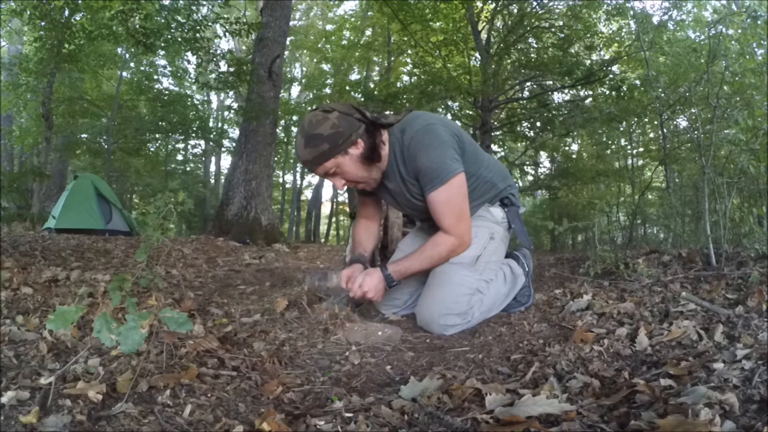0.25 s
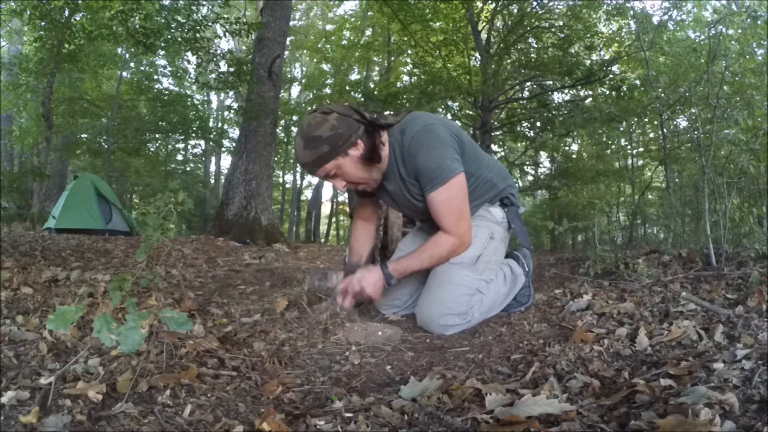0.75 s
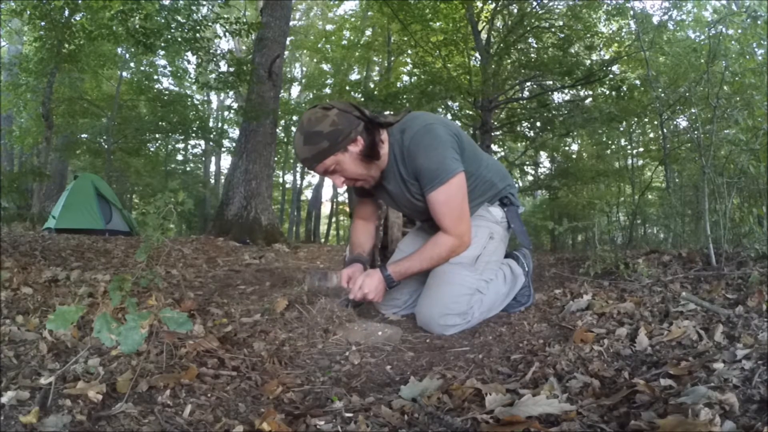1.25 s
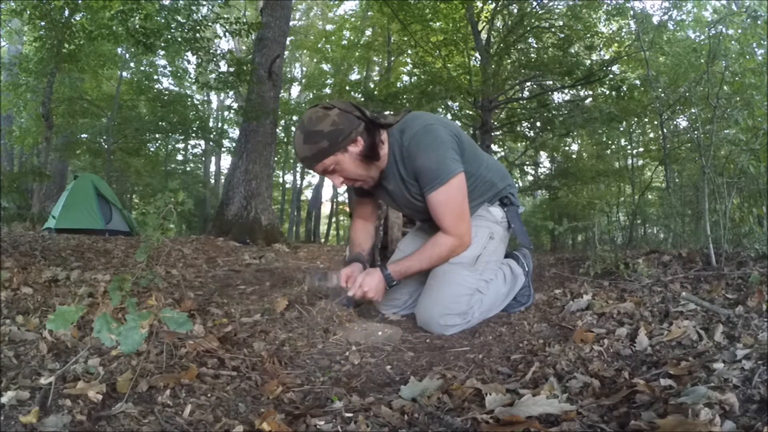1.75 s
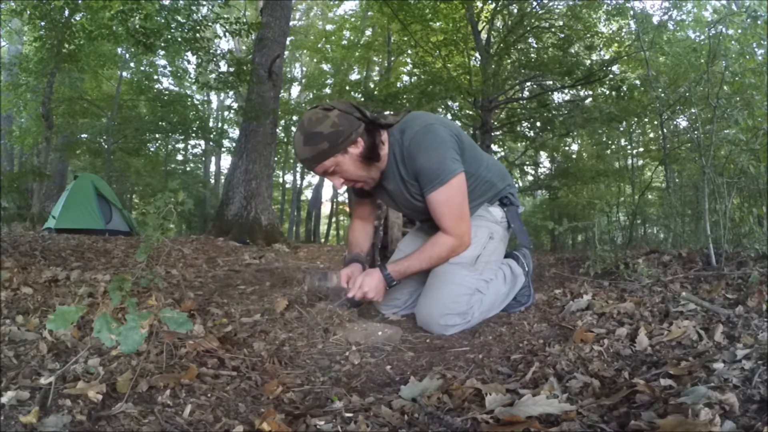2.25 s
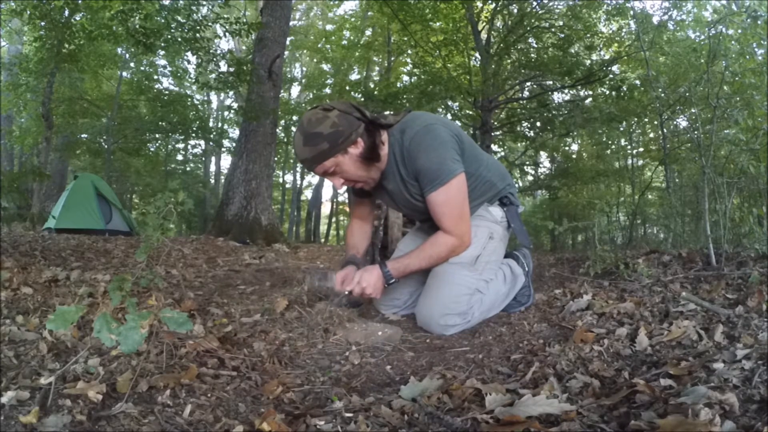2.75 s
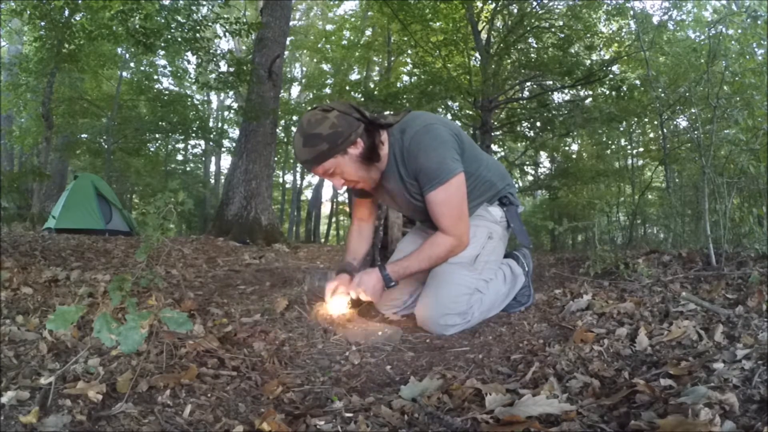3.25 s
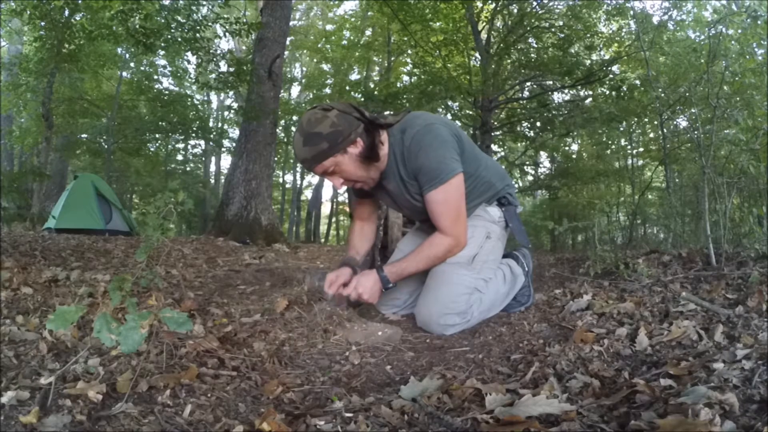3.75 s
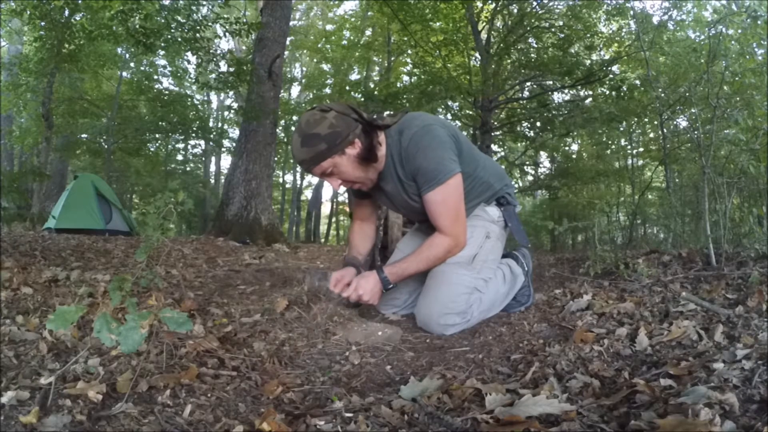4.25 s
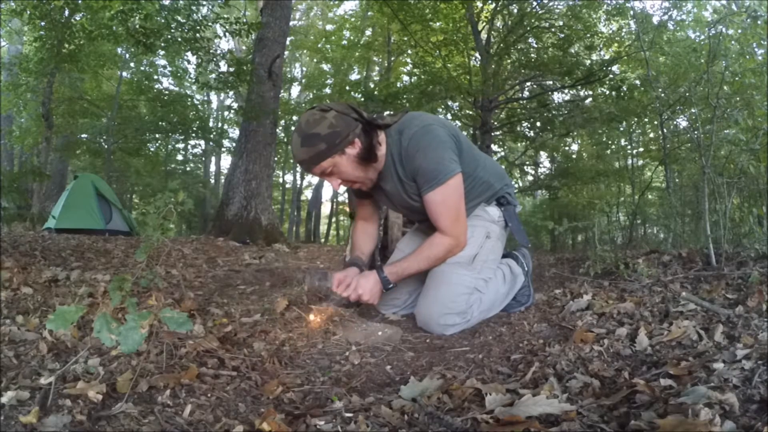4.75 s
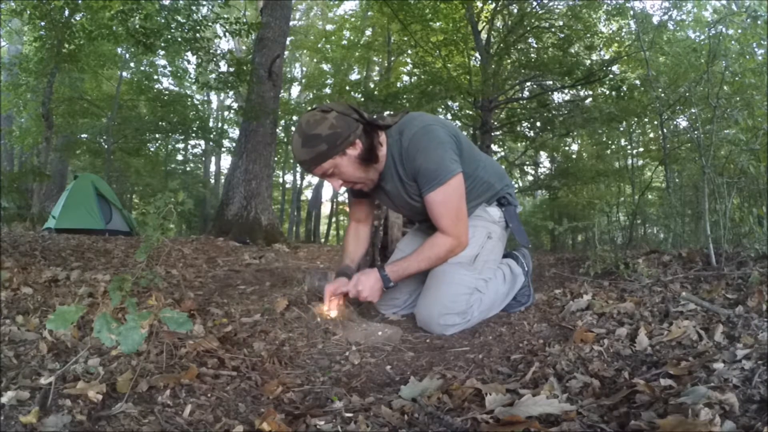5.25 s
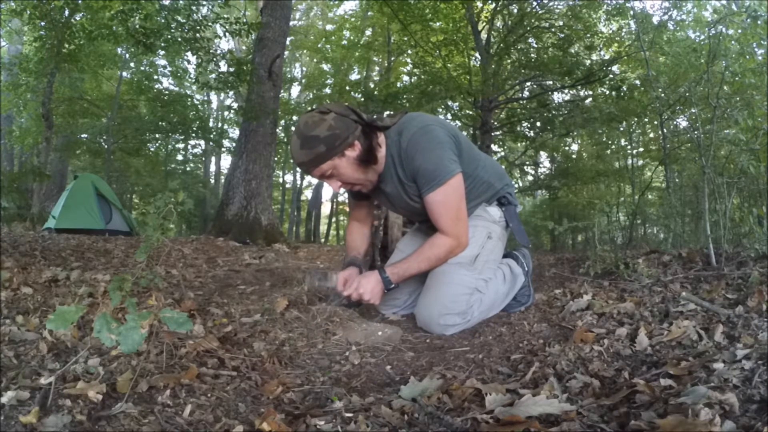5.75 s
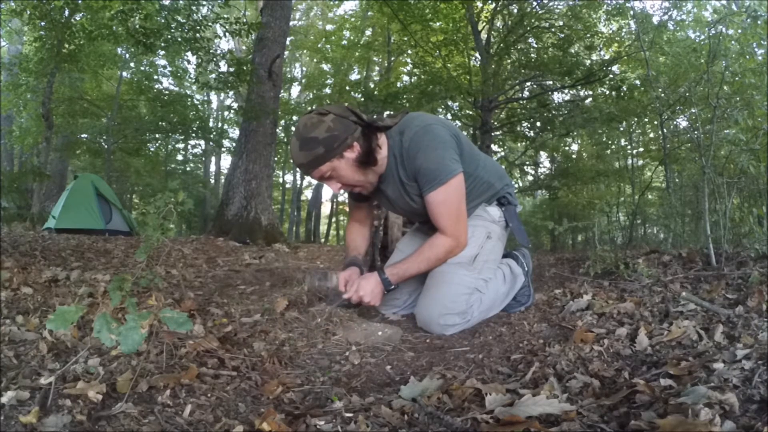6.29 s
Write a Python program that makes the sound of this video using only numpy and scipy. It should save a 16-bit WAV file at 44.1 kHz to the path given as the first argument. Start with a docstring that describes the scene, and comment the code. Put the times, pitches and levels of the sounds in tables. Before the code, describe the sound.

Repeated scraping of steel on a fire-starting rod outdoors: bright grinding zips end in clicks, then a soft puff and fizz of burning shavings. The scraper knocks the rod between strokes with short, finger-damped ticks of uneven strength. Light reflections from ground and foliage give a small open space. Low distant rumble and hum recede after the start, leaving a faint steady hiss and barely audible bird whistles. Nearly mono, no close ambience.

```python
"""Someone kneeling in a quiet wood strikes a ferrocerium rod with a steel scraper, fourteen times.
From the start: a low rumble, a drone and a thin hiss of air, all filtered noise; the first slip comes at once.
Each stroke is a swelling grind (noisy clicks), a slip, then sparks; knocks (damped modes) have their own times.
Rumble and drone fade from 1.7 s; far whistles (gliding sines) at 3.0 and 5.1 s; late shavings fizz after 5 s.
Sparse echoes and a decaying scatter place all but the background among trees."""
import sys
import numpy as np
from scipy import signal
from scipy.fft import rfft, irfft
from scipy.io import wavfile

SR = 44100
rng = np.random.default_rng(int(sys.argv[2]) if len(sys.argv) > 2 else 0)


def transcribe(signal):
    """Save signal, clipped to [-1, 1], as a 16-bit WAV file at the path in sys.argv[1]."""
    frames = np.atleast_2d(signal).T
    limited = np.clip(frames, -1, 1)
    pcm = np.round(limited * 32767).astype(np.int16)
    wavfile.write(sys.argv[1], SR, pcm)


N = 287532
T = np.arange(N) / SR  # s

# Event levels are nominal: layer gains, filters and the wood act on them later.
# Strokes along the rod: slip_s, draw_s, grind_db, snap_db, sparks_db, burn_s
STROKES = [(0.01, 0.046, -70, -64, -54, .075), (0.377, 0.082, -52.5, -28.5, -55.5, 0.035),
           (0.7662, 0.025, -51, -25.5, -61, 0.027), (1.4826, .06, -52, -30, -47.5, 0.03),
           (1.948, .052, -51.5, -33.5, -47, 0.028), (2.4365, 0.074, -53, -30.5, -51, 0.021),
           (2.848, 0.076, -54.5, -23.5, -47, 0.014), (3.293, 0.059, -52, -38, -48, 0.024),
           (3.7247, 0.075, -52.5, -34, -49.5, 0.019), (4.1496, 0.058, -55, -32, -49, 0.031),
           (4.6117, 0.066, -51.5, -28, -45, 0.026), (5.29, 0.057, -49, -33.5, -49.5, 0.027),
           (5.8563, .055, -50, -28, -50, 0.015), (6.4041, 0.07, -49.5, -28.5, -47.5, 0.039)]
# Knocks of scraper on rod: start_s, strength_db, favoured_hz
KNOCKS = [(0.2644, -35.5, 7700), (0.398, -40, 4150), (.627, -34, 3800), (0.863, -50, 4000),
          (0.8673, -24, 6470), (1.1754, -49.5, 4000), (1.4367, -39.5, 11000), (1.5494, -13.5, 5120),
          (1.7798, -35, 7300), (2.2447, -49.5, 3200), (2.2748, -46, 4000), (2.512, -14.5, 6100),
          (2.7135, -34, 6850), (3.148, -27, 4240), (3.566, -43, 2500), (3.5778, -28.5, 7460),
          (3.624, -43.5, 4150), (3.714, -27, 11000), (3.906, -30, 4140), (3.9848, -41, 7260),
          (4.4376, -29.5, 7500), (4.9925, -44.5, 7100), (5.3617, -19, 10500), (5.658, -46, 3860),
          (6.2185, -51, 3980), (6.2407, -57, 3000)]
# Finger-damped modes of scraper and rod: mode_hz, level_db, t60_s
STEEL_MODES = [(2040, -11.5, 0.011), (2900, -9, 0.017), (3844, -1, 0.0099), (4370, -9, 0.012),
               (5080, -3, .011), (6330, -5, 0.006), (7204, -2, 0.014), (7970, -8, 0.01), (10700, -6, 0.002),
               (13000, -15, 0.0012)]
# Late-burning stray shavings: start_s, level_db, t60_s
STRAYS = [(5.02, -63, 0.045), (6.06, -64, 0.19), (6.488, -54.5, 0.033)]
# Far bird's arched whistles: start_s, length_s, end_fall_share, level_db
WHISTLES = [(3.025, 0.1, 0.12, -75), (5.053, 0.14, .14, -83)]
# Reflections from ground and body: delay_s, level_db
ECHOES = [(.0015, -19), (.0025, -32), (.0102, -21.5), (0.0132, -18.5)]

# Drive of the steel by a knock of usual strength: freq_hz, level_db
KNOCK_DRIVE = [(3800, -16.5), (5300, -16.5), (7300, -16.5), (10000, -25.5), (15000, -26)]
# Drive of the steel by a slip of usual strength: freq_hz, level_db
SLIP_DRIVE = [(3800, -12.5), (5300, -15.5), (7300, -12), (10000, -17.5), (15000, -19)]

# Relative spectra, all with columns freq_hz, level_db (per Hz)
# Crushed skin of the rod
CRACK_SPECTRUM = [(250, -13), (600, -11.5), (1200, -9), (2200, -6), (3000, -1), (5000, 1), (8000, 2),
                  (11000, 0), (15000, -5.5)]
# Grinding edge
GRIND_SPECTRUM = [(200, -1), (600, -3.5), (1500, -11.5), (2300, -10.5), (2900, -29), (3300, -8.5),
                  (5800, -2), (7100, 6), (8200, 1.5), (9100, 5.5), (10500, -6.5), (15500, -12)]
# Rasp of the rod
RASP_SPECTRUM = [(2000, -27.5), (3200, -19.5), (3650, -4.5), (4000, 3), (4350, 1.5), (4800, -10),
                 (6500, -27)]
# Hissing sparks
HISS_SPECTRUM = [(300, -21.5), (2000, -8), (2700, 0.5), (3400, 2), (4000, -13), (4500, -0.5), (5150, 7.5),
                 (5700, 0.5), (6700, 1.5), (7200, 5.5), (10000, -3.5), (15500, -10.5)]
# Puff of the flare
FLARE_SPECTRUM = [(100, 5.5), (250, -1.5), (500, -4), (800, -3), (1100, -10), (1550, -7.5), (2100, -15),
                  (4000, -5.5), (12000, -8)]
# Stray shavings
STRAY_SPECTRUM = [(1500, -21), (5000, -2), (9000, 1), (15000, -4)]
# Scatter from foliage
FOLIAGE_SPECTRUM = [(200, -20.5), (1000, -4.5), (3500, -4), (7000, -1.5), (10000, 0), (15500, -2)]
# Low rumble
RUMBLE_SPECTRUM = [(8.8, -22), (15, 0), (54, 1), (104, -8), (161, -20), (200, -16.5), (260, -47),
                   (440, -120)]
# Far drone
DRONE_SPECTRUM = [(80, -13), (125, 6.5), (170, -13), (215, -0.5), (280, -1.5), (360, -1.5), (430, -18),
                  (600, -31), (1200, -47.5)]
# Thin even hiss
AIR_SPECTRUM = [(260, -24.5), (450, 0.5), (545, -2), (1370, -6), (2660, -7.5), (3830, -7.5), (5870, -7.5),
                (6890, -8), (7870, -10.5), (15000, -12)]
# Faint noise that differs between left and right
SIDE_SPECTRUM = [(20, 14), (120, -11), (500, -32.5), (4000, -23.5), (15000, -35)]

RASP_REL_GRIND_DB = -2.5
USUAL_SPARKS_DB, HISS_T60_S = -50, 0.14
FLARE_DB, FLARE_DB_PER_SPARKS_DB = -55.5, 1.52  # flare level at usual sparks
USUAL_CONTACT_DB, DRIVE_PIVOT_HZ = -30, 5000
BRIGHTEN_DB_PER_OCTAVE = 0.44  # per dB that a contact is harder
FAVOUR_DB, FAVOUR_OCTAVES, SLIP_FAVOURS_HZ = 7.5, 0.26, 4260
MODE_DETUNE_SHARE = 0.01337
CATCH_DB, CATCH_GROWTH_DB = 18.5, 18.5  # over grind_db at the end of a draw; rise along it
WHISTLE_PEAK_HZ = 5030
RUMBLE_DB, DRONE_DB, AIR_DB = -51, -62, -76.5
RECEDE_FROM_S, RUMBLE_FADE_DB_PER_S, DRONE_FADE_DB_PER_S = 1.72, 0.65, 2.5
CUTOFF_HZ = 15600


def scrapes(swell_db=17, rasp_swell_db=13, release_s=0.0018, kindle_s=0.017, glow_s=0.012,
            die_s=0.0049, wane_db=4, bite_share=0.26):
    """The edge tears off shavings, louder along the draw; they ignite, hiss and sputter."""
    grind, rasp, hiss, flare = np.zeros((4, N))
    for slip_s, draw_s, grind_db, _, sparks_db, burn_s in STROKES:
        now = slice(*np.searchsorted(T, [slip_s - 0.15, slip_s + 0.3]))
        travel = np.clip(1 + (T[now] - slip_s) / draw_s, 0, 1)
        before_s = np.maximum(slip_s - T[now], 0)
        after_s = np.maximum(T[now] - slip_s, 0)
        contact = np.minimum(travel / bite_share, 1) * np.exp(-after_s / release_s)
        grind[now] += contact * from_db(grind_db + swell_db * (travel - 1.07))
        rasp_db = grind_db + RASP_REL_GRIND_DB + rasp_swell_db * (travel - 0.27)
        rasp[now] += contact * from_db(rasp_db)
        hiss_db = sparks_db - 60 * after_s / HISS_T60_S
        hiss[now] += np.exp(-before_s / kindle_s) * from_db(hiss_db)
        # the flash puffs the air, wanes while the shavings burn, then goes out
        flare_db = FLARE_DB + FLARE_DB_PER_SPARKS_DB * (sparks_db - USUAL_SPARKS_DB)
        glow = np.exp(-before_s / glow_s - np.maximum(after_s - burn_s, 0) / die_s)
        flare[now] += from_db(flare_db - wane_db * after_s / burn_s) * glow
    bites = flutter(per_s=630, depth_db=0.5)  # the edge catches and lets go
    sputter = flutter(per_s=500, depth_db=4.5)
    grind_grains = grind * bites * grains(per_s=8300, spread_db=4.5)
    rasp_grains = rasp * bites * grains(per_s=6300, spread_db=3.0)
    hiss_grains = hiss * np.sqrt(sputter) * grains(per_s=7200, spread_db=0.0)
    flare_grains = flare * sputter * grains(per_s=3500, spread_db=2.5)
    metal = from_db(2.0) * colour(grind_grains, GRIND_SPECTRUM)
    metal += from_db(-6.5) * colour(rasp_grains, RASP_SPECTRUM)
    sparks = colour(hiss_grains, HISS_SPECTRUM)
    sparks += from_db(5.5) * colour(flare_grains, FLARE_SPECTRUM)
    return metal + sparks


def contacts(catches_per_draw=3):
    """Slips, knocks and random catches of the edge: start_s, strength_db, favoured_hz, drive."""
    slips = [(slip_s, snap_db, SLIP_FAVOURS_HZ, SLIP_DRIVE) for slip_s, _, _, snap_db, _, _ in STROKES]
    knocks = [(start_s, db, hz, KNOCK_DRIVE) for start_s, db, hz in KNOCKS]
    catches = []
    for slip_s, draw_s, grind_db, *_ in STROKES:
        for left in rng.random(catches_per_draw):  # share of the draw still to go
            start_s = max(slip_s - left * draw_s, 0)
            strength_db = grind_db + CATCH_DB - CATCH_GROWTH_DB * left
            catches.append((start_s, strength_db, SLIP_FAVOURS_HZ, SLIP_DRIVE))
    return slips + knocks + catches


def drive(points, strength_db, favoured_hz):
    """A harder contact is louder and brighter; where it lands lifts one part of the spectrum."""
    hz = np.geomspace(200, 15000, 60)
    octaves = np.log2(np.maximum(hz, points[0][0]) / DRIVE_PIVOT_HZ)
    tilt_db = BRIGHTEN_DB_PER_OCTAVE * (strength_db - USUAL_CONTACT_DB) * octaves
    lift_db = FAVOUR_DB * np.exp(-(np.log2(hz / favoured_hz) / FAVOUR_OCTAVES) ** 2)
    return np.column_stack([hz, strength_db + at_hz(points, hz) + tilt_db + lift_db])


def ticks(crack_db=-8.5, snap_db=5, crack_s=0.0016, ring_db=3, contact_s=0.0002):
    """Each touch cracks and rings briefly; each mode is detuned a little at random."""
    rings, cracks = np.zeros((2, N))
    t = T[:1024]
    mode_hz, mode_db, t60_s = np.transpose(STEEL_MODES)[:, :, None]
    press = 1 - np.exp(-t / contact_s)
    for start_s, strength_db, favoured_hz, points in contacts():
        start = round(start_s * SR)
        now = slice(start, start + len(t))
        balance = drive(points, strength_db, favoured_hz)
        pitch_hz = mode_hz * (1 + MODE_DETUNE_SHARE * rng.uniform(-1.1, 1, mode_hz.shape))
        swing = np.sin(2 * np.pi * (pitch_hz * t + rng.random(mode_hz.shape)))
        level_db = ring_db + mode_db + at_hz(balance, pitch_hz) - 60 * t / t60_s
        rings[now] += press * np.sum(swing * from_db(level_db), axis=0)
        # the edge crushes the rod's rough skin, then meets the metal beneath
        crunch = press * rng.choice([-1, 1], len(t)) * np.exp(-t / crack_s)
        crunch[round(2 * contact_s * SR)] += from_db(snap_db)
        cracks[now] += from_db(strength_db + crack_db) * colour(crunch, balance, size=1024)
    return rings + colour(cracks, CRACK_SPECTRUM)


def strays(kindle_s=0.004):
    """Single shavings fizz as they fall: fast-rising, decaying grains."""
    level = np.zeros(N)
    for start_s, level_db, t60_s in STRAYS:
        age_s = np.maximum(T - start_s, 0)
        level += (1 - np.exp(-age_s / kindle_s)) * from_db(level_db - 60 * age_s / t60_s)
    return colour(level * grains(per_s=12000, spread_db=2.0), STRAY_SPECTRUM)


def bird(waver_db=4):
    """Thin sine whistles that rise and fall, blurred by the trees between."""
    out = np.zeros(N)
    for start_s, length_s, fall_share, level_db in WHISTLES:
        now = slice(*np.searchsorted(T, [start_s, start_s + length_s]))
        along = (T[now] - start_s) / length_s
        pitch_hz = WHISTLE_PEAK_HZ * (1 - fall_share * (2 * along - 1) ** 2)
        whistle = np.sin(2 * np.pi * np.cumsum(pitch_hz) / SR)
        out[now] += from_db(level_db) * np.sin(np.pi * along) * whistle
    return out * flutter(per_s=380, depth_db=waver_db)


def wood(x, near_db=-12.5, near_t60_s=0.17, far_db=-23, far_t60_s=0.51, gap_s=0.0068, sway_s=0.00041):
    """Close reflections, quick scatter from leaf litter, a faint long tail from the trunks."""
    t = T[:SR]
    opening = np.clip((t - gap_s) / 0.0019 + 1, 0, 1)
    scatter = np.zeros(SR)
    for level_db, t60_s in ((near_db, near_t60_s), (far_db, far_t60_s)):
        tail = rng.standard_normal(SR) * opening * from_db(-60 * t / t60_s)
        scatter += from_db(level_db) * rms_one(tail) / np.sqrt(SR)  # unit energy before level_db
    out = x + signal.fftconvolve(x, colour(scatter, FOLIAGE_SPECTRUM))[:N]
    for delay_s, level_db in ECHOES:
        # the hands move, so each path keeps changing its length a little
        sway = sway_s * np.interp(T, np.linspace(0, T[-1], num=40), rng.uniform(-1, 1, size=40))
        out += from_db(level_db) * np.interp(T - delay_s - sway, T, x)
    return out


def background():
    """Filtered noise: a low rumble and a far drone that recede together, and a thin even hiss."""
    receding_s = np.maximum(T - RECEDE_FROM_S, 0)
    rumble = from_db(RUMBLE_DB - RUMBLE_FADE_DB_PER_S * receding_s) * noise(RUMBLE_SPECTRUM)
    drone = from_db(DRONE_DB - DRONE_FADE_DB_PER_S * receding_s) * noise(DRONE_SPECTRUM)
    return rumble + drone + from_db(AIR_DB) * noise(AIR_SPECTRUM)


def noise(points):
    """Steady coloured noise, rms 1."""
    return rms_one(colour(rng.standard_normal(N), points, size=16384))


def flutter(per_s, depth_db):
    """Random gain, rms 1, with per_s new targets a second joined by straight lines in dB."""
    knots = np.clip(rng.standard_normal(N // 8), -2, 2)
    return rms_one(from_db(depth_db * np.interp(T * per_s, np.arange(len(knots)), knots)))


def grains(per_s, spread_db):
    """Random clicks of uneven size and either sign, rms 1."""
    sizes = from_db(spread_db * np.minimum(rng.exponential(1, N), 4)) * rng.choice([-1, 1], N)
    return rms_one(sizes * (rng.random(N) < per_s / SR))


def colour(x, points, size=4096):
    """Filter a sound with a spectrum's shape."""
    return signal.oaconvolve(x, response(points, size=size))[:len(x)]


def response(points, size=4096):
    """Minimum-phase impulse response of unit energy, falling away beyond the spectrum's ends."""
    hz = np.maximum(np.arange(size // 2 + 1) * SR / size, 1)
    low_edge = np.minimum(hz / points[0][0], 1) ** 2
    high_edge = np.minimum(points[-1][0] / hz, 1) ** 4
    gain = from_db(at_hz(points, hz)) * low_edge * high_edge
    cepstrum = irfft(np.log(rms_one(gain) + 1e-5), size)
    cepstrum[1:size // 2] *= 2  # fold onto positive time: causal
    cepstrum[size // 2 + 1:] = 0
    return irfft(np.exp(rfft(cepstrum)), size)


def at_hz(points, hz):
    """Read a spectrum in dB on a log-frequency axis."""
    freq_hz, level_db = np.transpose(points)
    return np.interp(np.log(np.maximum(hz, 1)), np.log(freq_hz), level_db)


def from_db(db):
    """Decibels to amplitude ratio."""
    return 10 ** (np.asarray(db) / 20)


def rms_one(x):
    """Scale to rms 1."""
    return x / np.sqrt(np.mean(x ** 2) + 1e-20)


def scene():
    """Scraper, sparks and bird in the wood, over the background, alike in both channels."""
    mono = wood(scrapes() + ticks() + strays() + bird()) + background()
    return np.stack([mono, mono])


def record(dry, side_db=-84):
    """Two almost equal channels plus faint noise that differs between them; the top is cut steeply."""
    side = from_db(side_db) * np.stack([noise(SIDE_SPECTRUM), noise(SIDE_SPECTRUM)])
    both = dry * from_db([[0.04], [-0.04]]) + side
    low_pass = signal.ellip(10, 0.2, 70, CUTOFF_HZ, fs=SR, output="sos")  # ripple dB, stopband dB
    return signal.sosfilt(low_pass, both)


dry = scene()
out = record(dry)
transcribe(out)
```